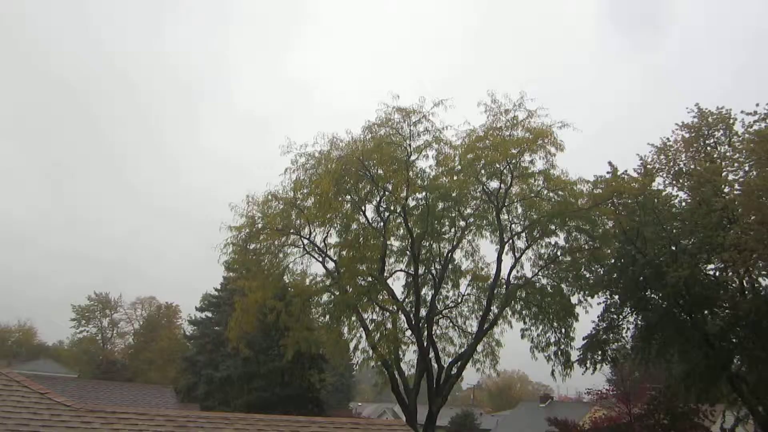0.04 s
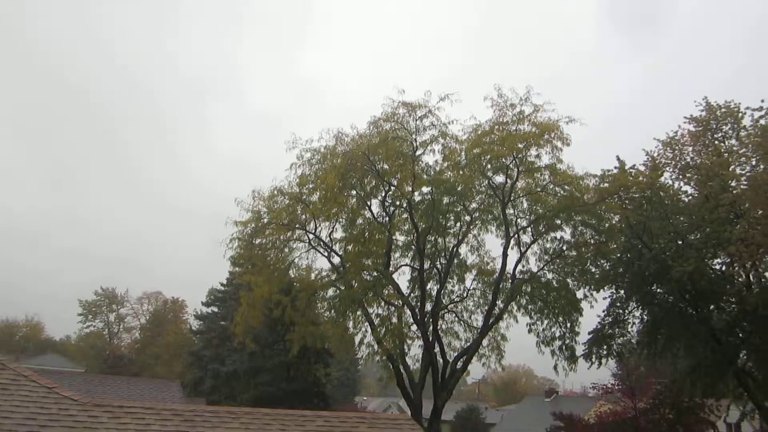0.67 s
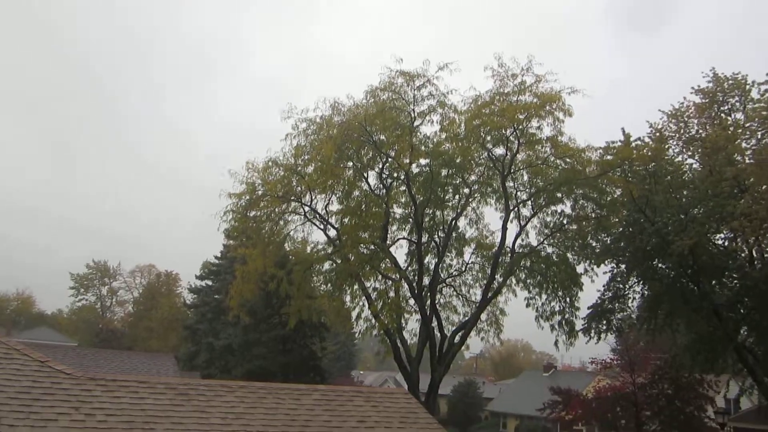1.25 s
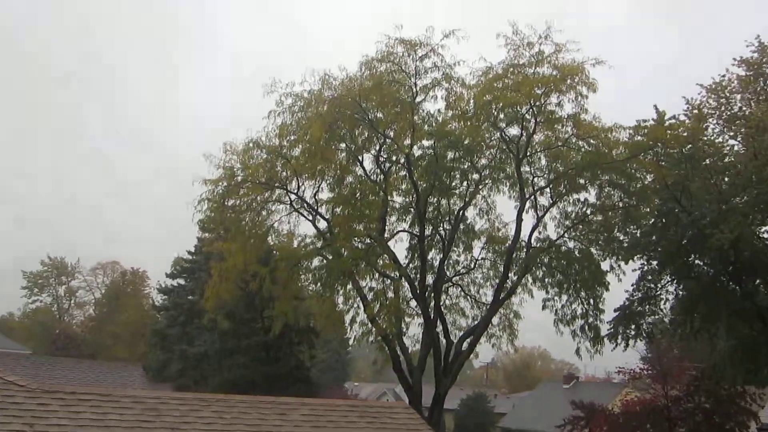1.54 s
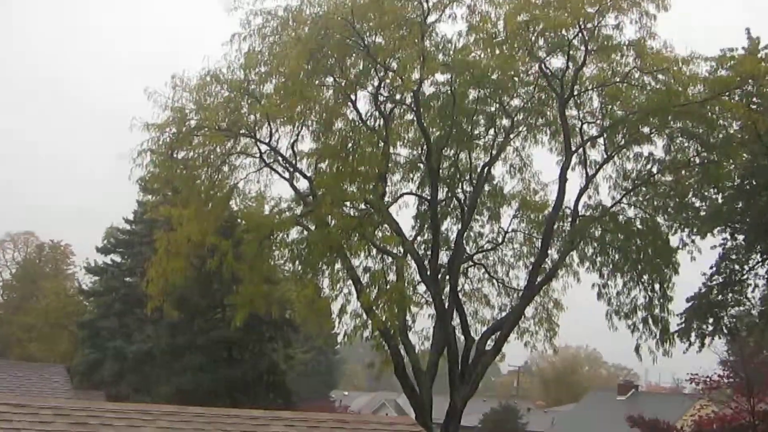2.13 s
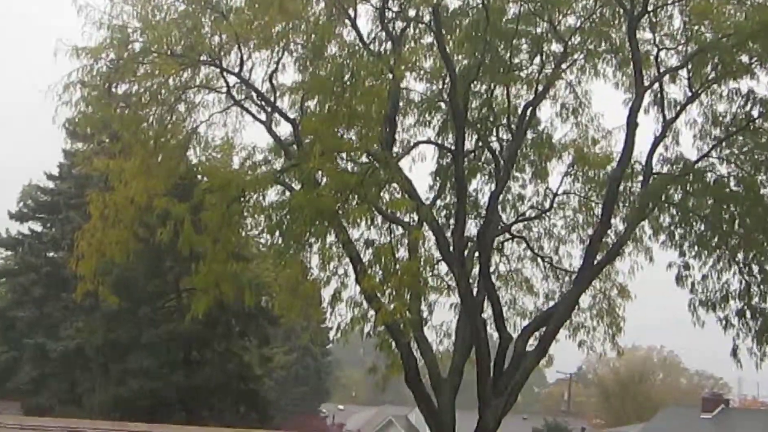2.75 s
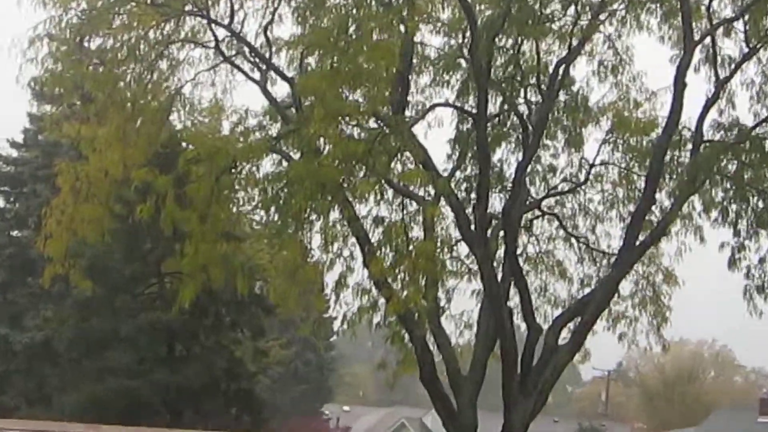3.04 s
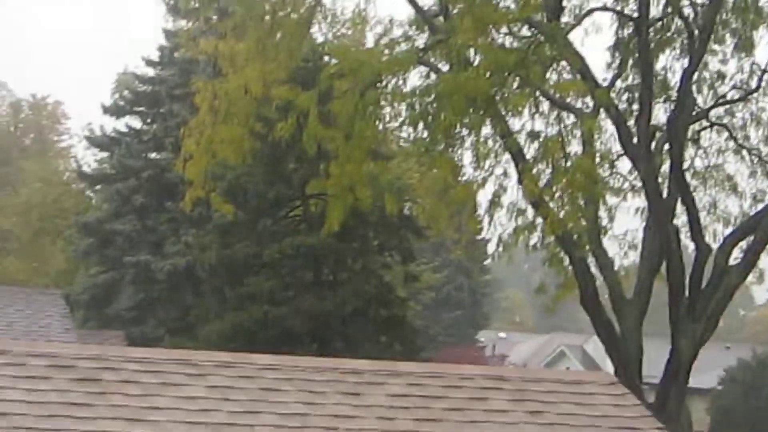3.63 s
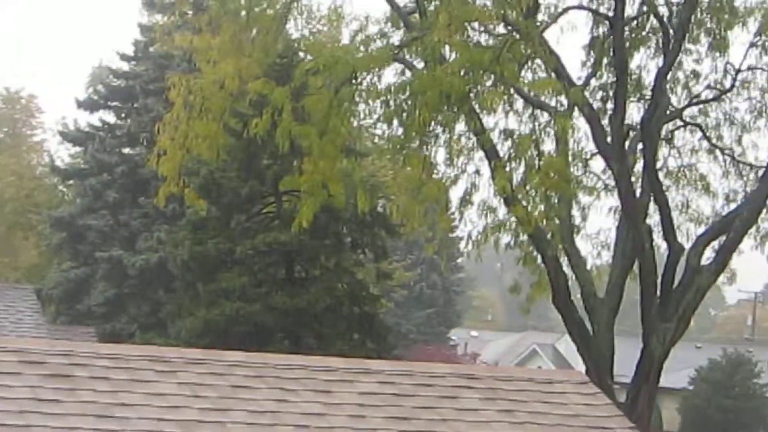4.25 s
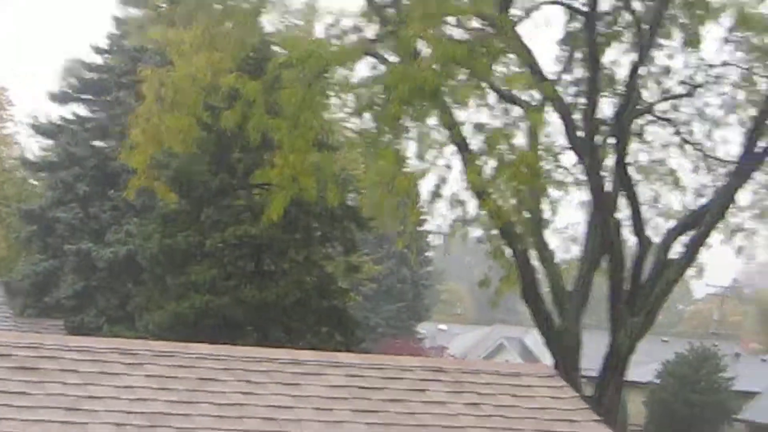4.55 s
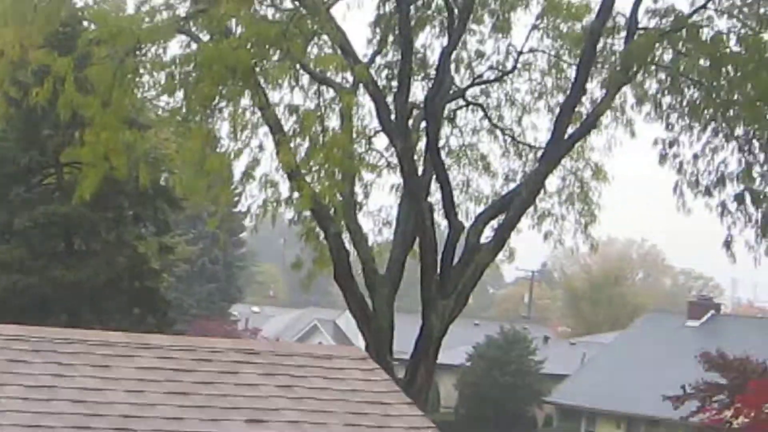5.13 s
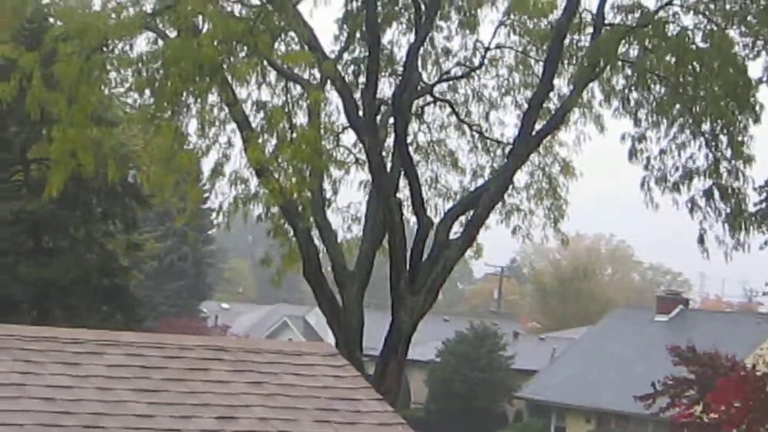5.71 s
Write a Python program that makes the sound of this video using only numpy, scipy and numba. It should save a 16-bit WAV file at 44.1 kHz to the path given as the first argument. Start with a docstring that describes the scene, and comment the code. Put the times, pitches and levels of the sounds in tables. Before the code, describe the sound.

Steady rain fades in over the first second or so, falling on trees and shingle roofs above a low outdoor rumble. Distant drops merge into an even wash, while nearer ones tick on leaves and tap on shingles, with occasional fat splats close by. A few soft, hollow plops land on the gutter between about 1.5 and 5 seconds. Roof water trickles into a downpipe and drips four or five times a second with a faint, hollow ring, heaviest at around 4.5 seconds.

At about 3 seconds, one sharp plastic handling click sounds right at the microphone of the hand-held camera, the loudest moment. Everything dips in level immediately afterwards, then swells back within a second. The rain and dripping continue until the end, near 6 seconds. The sound is mono, heard from beside a house.

```python
"""The sound swells in at the start: steady rain on trees and shingle roofs, over a low outdoor rumble. Far
drops merge into a wash; near ones tick on leaves, tap on shingles, splat, and plop on the gutter. Roof water
trickles and drips into a downpipe and rings its modes. At 3 s a sharp handling click rings the shell of a hand-
held camera beside the house. Its gain control ducks, and the rain swells back within a second. Mono."""
import sys
import numpy as np
from scipy import signal
from scipy.fft import rfft, irfft
from scipy.io import wavfile
from scipy.ndimage import uniform_filter1d
from numba import njit

SR = 44100
rng = np.random.default_rng(int(sys.argv[2]) if len(sys.argv) > 2 else 0)


def master_out(mix):
    """Clip the mix to full scale and print it as 16-bit PCM to the path in sys.argv[1]."""
    frames = np.transpose(np.atleast_2d(mix))
    ceiling = np.clip(frames, -1, 1)
    pcm = np.round(ceiling * 32767).astype(np.int16)
    wavfile.write(sys.argv[1], SR, pcm)


N = 254898
T = np.arange(N) / SR
BIN_HZ = np.maximum(np.fft.rfftfreq(N, 1 / SR), 1)


def undb(db):
    """Decibels to gain."""
    return 10 ** (np.asarray(db) / 20)


def set_rms(x, db):
    """Scale to an rms level."""
    return x * undb(db) / np.sqrt(np.mean(x ** 2))


def wander(rate_hz):
    """Random steps, smoothed twice; rms 1."""
    hold = int(SR / rate_hz)
    steps = np.repeat(rng.standard_normal(N // hold + 2), hold)
    return set_rms(uniform_filter1d(uniform_filter1d(steps, hold), hold)[:N], 0)


def colour(x, spectrum):
    """Filter by (frequency [Hz], gain [dB]) points."""
    hz, db = np.transpose(spectrum)
    return irfft(rfft(x) * undb(np.interp(np.log(BIN_HZ), np.log(hz), db)), N)


def resonate(x, hz, width_hz):
    """Two-pole resonance, unity gain at the centre."""
    return signal.lfilter(*signal.iirpeak(hz, hz / width_hz, fs=SR), x)


def add(out, at_s, sound):
    """Mix a short sound in."""
    i = int(np.clip(at_s * SR, 0, N - 1))
    out[i:i + len(sound)] += sound[:N - i]


def swell_db(steady_db=.55, fade_db=7.2, settle_s=.68):
    """Level curve: swells in at the start, then holds."""
    return steady_db - fade_db * np.exp(-T / settle_s)


# Far rain on leaves and roofs: (frequency [Hz], gain [dB])
WASH_SPECTRUM = [(120, -4.5), (300, 0.1), (500, -0.2), (850, 0.24), (1300, 1.2), (2000, -0.5), (3200, -0.9),
                 (5000, -3.5), (7000, -7), (10000, -10.5), (12500, -16), (15000, -23.5), (16000, -33)]
def far_wash(flicker_db, flutter_db):
    """Countless far drops: each band flickers alone; all flutter together as drops land in clusters."""
    noise = rfft(rng.standard_normal(N))
    half_octave = np.floor(2 * np.log2(np.maximum(BIN_HZ, 128)))
    wash = sum(irfft(noise * (half_octave == band), N) * undb(flicker_db * wander(28))
               for band in np.unique(half_octave))
    return colour(wash * undb(flutter_db * wander(60)), WASH_SPECTRUM)


def patter(drops_per_s, low_hz, high_hz, decay_cycles, spread_db, cap_db):
    """Random drops, each a brief ring at its own pitch; most are small, a few are near."""
    out, t = np.zeros(N), T[:1024]
    for when, pitch, size, length, polarity in rng.random((int(drops_per_s * N / SR), 5)):
        hz = low_hz * (high_hz / low_hz) ** pitch
        db = min(-spread_db * np.log(1 - size), cap_db)
        ring = np.exp(-t * hz / (decay_cycles * (.5 + length))) * np.sin(2 * np.pi * hz * t)
        add(out, when * N / SR, undb(db) * ring * np.sign(polarity - .5))
    return out


def wall_scatter(x, tail_db, decay_s):
    """Walls and eaves add a short diffuse tail."""
    tail = rng.standard_normal(4096) * np.exp(-T[:4096] / decay_s)
    return x + undb(tail_db) * signal.fftconvolve(x, tail / np.linalg.norm(tail))[:N]


# Treble roll-off of the close drops: (frequency [Hz], gain [dB])
DROP_TREBLE_ROLLOFF = [(1500, -3), (3000, 0), (9500, 0), (12000, -3), (14000, -8), (15200, -12),
                       (16000, -22)]
def leaf_ticks():
    """Near drops tick on leaves, with the top treble dulled."""
    ticks = patter(drops_per_s=900, low_hz=2780, high_hz=13500, decay_cycles=.83,
                   spread_db=4.8, cap_db=19.5)
    return colour(wall_scatter(ticks, tail_db=-5, decay_s=.005), DROP_TREBLE_ROLLOFF)


def shingle_taps():
    """Drops tap on shingles, lower and sparser."""
    taps = patter(drops_per_s=220, low_hz=400, high_hz=2000, decay_cycles=1.17, spread_db=3, cap_db=11)
    return wall_scatter(taps, tail_db=-2, decay_s=.014)


# Outdoor rumble: (frequency [Hz], gain [dB])
RUMBLE_SPECTRUM = [(15, -15), (28, -4), (48, 1.5), (70, -1.5), (100, -5.5), (145, -2.5), (200, -8.5),
                   (280, -16.5), (450, -31.5), (2000, -72)]
def outdoor_rumble(waver_db):
    """Low noise with a wavering level."""
    return colour(rng.standard_normal(N), RUMBLE_SPECTRUM) * undb(waver_db * wander(7))


# Downpipe resonances: (frequency [Hz], width [Hz], relative level [dB])
PIPE_MODES = [(1066, 25, -12), (1162, 30, -10), (1247, 22, -3), (1297, 25, -6), (1381.5, 20, 0),
              (1460, 36, -12), (1580, 70, -11), (2000, 60, -19)]
def pipe_ring(water):
    """Water rings the pipe; adjacent modes swing in opposite senses, so little leaks outside them."""
    drive = resonate(water, hz=1360, width_hz=800)
    return sum((-1) ** k * set_rms(resonate(drive, hz, width_hz), db)
               for k, (hz, width_hz, db) in enumerate(PIPE_MODES))


# Runs of light drips: (start [s], end [s])
LIGHT_DRIP_RUNS = [(.397, 1.8), (2.036, 3.2), (3.449, 5.75)]
# Heavy drips: (time [s], relative level [dB])
HEAVY_DRIPS = [(1.268, -7), (1.71, -7), (2.259, -4.5), (2.475, -4), (2.688, -4), (3.09, -3.5), (3.445, -1),
               (3.662, -1), (4.318, -2.5), (4.548, 3), (4.765, 2), (5.208, -2.5), (5.632, -2)]
def downpipe(trickle_db, light_db, spread_db, period_s, rise_s, splash_s, decay_s):
    """An uneven trickle follows the rain; roof water gathers and drips evenly, now light, now heavy."""
    trickle = undb(trickle_db + swell_db() + 2.5 * wander(14))
    t = T[:12000]
    spatter = (1 - np.exp(-t / rise_s)) * np.exp(-np.maximum(t - splash_s, 0) / decay_s)
    light, heavy = np.zeros((2, N))
    for start_s, end_s in LIGHT_DRIP_RUNS:
        for at_s in np.arange(start_s, end_s, period_s):
            add(light, at_s, undb(light_db + spread_db * rng.standard_normal()) * spatter)
    for at_s, db in HEAVY_DRIPS:
        add(heavy, at_s, undb(db) * spatter)
    flow = trickle + np.maximum(light, heavy)
    return pipe_ring(flow * rng.standard_normal(N))


# Fat drops close by: (time [s], relative level [dB], centre [Hz], decay [s])
FAT_DROPS = [(.678, -33, 3200, .017), (1.1185, -33, 7000, .002), (1.371, -31, 6000, .005),
             (1.420, -34, 4500, .012), (2.167, -29, 4500, .0015), (2.703, -33, 4500, .008),
             (3.290, -31, 6500, .005), (3.568, -28, 7000, .0015), (3.5954, -22, 5200, .0015),
             (3.807, -27, 5500, .002), (4.3143, -28, 5500, .004), (5.092, -31.5, 6500, .0083)]
def splats(spray_db, spray_s, small_per_s, small_db, small_mean_hz, small_mean_s):
    """Fat drops crack and their spray falls back; small ones land at random. Top treble dulled."""
    out, t = np.zeros(N), T[:4096]
    small_drops = [(when * N / SR, small_db, small_mean_hz * (.5 + pitch), small_mean_s * (.5 + length))
                   for when, pitch, length in rng.random((int(small_per_s * N / SR), 3))]
    for at_s, db, hz, decay_s in FAT_DROPS + small_drops:
        burst = set_rms(resonate(rng.standard_normal(len(t)), hz, width_hz=.5 * hz), db)
        envelope = np.exp(-t / decay_s) + undb(spray_db) * np.exp(-t / spray_s)
        add(out, at_s, burst * envelope)
    return colour(out, DROP_TREBLE_ROLLOFF)


# Hollow drops on gutter and eaves: (time [s], relative level [dB], pitch [Hz])
GUTTER_DROPS = [(1.585, -32, 150), (2.45, -36, 569), (2.47, -30.5, 74), (2.738, -37, 400),
                (2.805, -36, 996), (4.208, -31.5, 572), (5.02, -33.5, 162.4)]
def gutter_plops(ref_decay_s, ref_hz, rise_share):
    """Each soft blow wakes one hollow note; lower notes ring longer."""
    out, t = np.zeros(N), T[:16000]
    for at_s, db, hz in GUTTER_DROPS:
        decay_s = ref_decay_s * np.sqrt(ref_hz / hz)
        envelope = (1 - np.exp(-t / (rise_share * decay_s))) * np.exp(-t / decay_s)
        add(out, at_s, undb(db) * envelope / envelope.max() * np.sin(2 * np.pi * hz * t))
    return out


# Slips and snap of the pressed camera: (time [s], relative level [dB])
SHELL_CLICKS = [(3.0443, -17), (3.0453, -13), (3.0464, -11), (3.0472, 2), (3.0477, -2), (3.0486, -6),
                (3.0505, -10)]
# Its plastic shell: (frequency [Hz], relative level [dB], decay [s])
SHELL_MODES = [(620, -20, 0.0013), (1080, -19, 0.0014), (2380, -13, 0.0014), (2850, -16, 0.0013),
               (4050, -12, 0.0014), (4650, -13, .0012), (6100, -5, .0011), (7200, -11.5, 0.0013),
               (8320, -16, .0008), (10900, -18, .0005), (13940, -9, .0004), (15200, -12, .0004)]
def handling_click(crack_db, crack_s):
    """Tiny slips and one snap, each a brief crack that rings the shell."""
    out, t = np.zeros(N), T[:1024]
    ring = sum((-1) ** k * undb(db) * np.exp(-t / decay_s) * np.sin(2 * np.pi * hz * t)
               for k, (hz, db, decay_s) in enumerate(SHELL_MODES))
    for at_s, db in SHELL_CLICKS:
        crack = undb(crack_db) * np.exp(-t / crack_s) * rng.standard_normal(len(t))
        add(out, at_s, undb(db) * (ring + crack))
    return out


@njit
def peak_detector(excess, attack_share, release_share, hold_samples):
    """Charges fast on overload, holds, then drains slowly."""
    out, charge, wait = np.empty(len(excess)), 0., 0.
    for i in range(len(excess)):
        if excess[i] > charge:
            charge += (excess[i] - charge) * attack_share
            wait = hold_samples
        elif wait > 0:
            wait -= 1
        else:
            charge -= charge * release_share
        out[i] = charge
    return out


def gain_control(x, threshold_db, depth, lag_s, hold_s, release_s):
    """Peaks over the threshold turn the gain down, milliseconds too late to catch a click."""
    power = signal.lfilter([1 / 128], [1, 1 / 128 - 1], x ** 2)
    excess = np.maximum(np.sqrt(power) - undb(threshold_db), 0)
    held = peak_detector(excess, 0.46, 1 / (release_s * SR), hold_s * SR)
    slew = 1 / (lag_s * SR)
    duck_nepers = signal.lfilter([slew], [1, slew - 1], np.log1p(depth * held))
    return x * np.exp(-duck_nepers)


def scene():
    """Rain, rumble, downpipe, close drops and the click at one microphone."""
    wash = set_rms(far_wash(flicker_db=.85, flutter_db=.5), -35.5)
    leaves = set_rms(leaf_ticks(), -46)
    shingles = set_rms(shingle_taps(), -50)
    rumble = set_rms(outdoor_rumble(waver_db=.85), -37.5)
    rain = (wash + leaves + shingles + rumble) * undb(swell_db())
    pipe = downpipe(trickle_db=-18, light_db=-12.5, spread_db=2, period_s=.219,
                    rise_s=.004, splash_s=.028, decay_s=.012)
    drops = splats(spray_db=-19.5, spray_s=.014,
                   small_per_s=3, small_db=-36, small_mean_hz=8000, small_mean_s=.003)
    plops = gutter_plops(ref_decay_s=.022, ref_hz=400, rise_share=.45)
    click = handling_click(crack_db=-12.5, crack_s=.00092)
    mono = rain + set_rms(pipe, -46.5) + drops + undb(-2) * plops + undb(1) * click
    return np.array([mono, mono])


def record(dry):
    """The camera switches on, rides its gain, rounds peaks and cuts the top treble."""
    start_s, ceiling, cutoff_hz = .0725, .62, 16000
    ducked = gain_control(dry[0], threshold_db=-22, depth=12, lag_s=.0051, hold_s=.062, release_s=.31)
    rounded = ceiling * np.tanh(ducked / ceiling) * (T >= start_s)
    mono = signal.sosfilt(signal.ellip(10, .2, 80, cutoff_hz, fs=SR, output="sos"), rounded)
    return np.array([mono, mono])


dry = scene()
out = record(dry)
master_out(out)
```